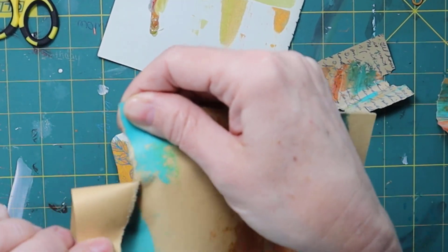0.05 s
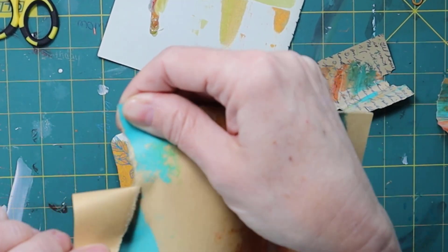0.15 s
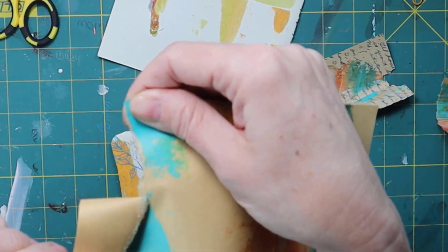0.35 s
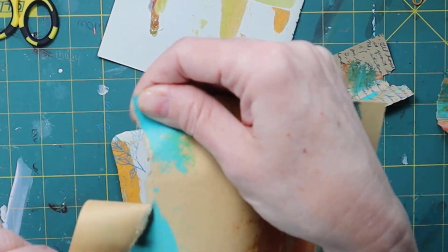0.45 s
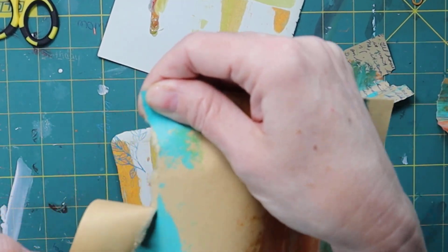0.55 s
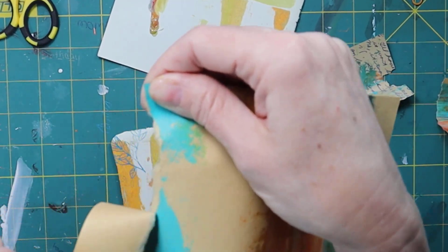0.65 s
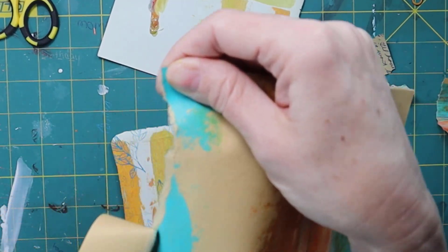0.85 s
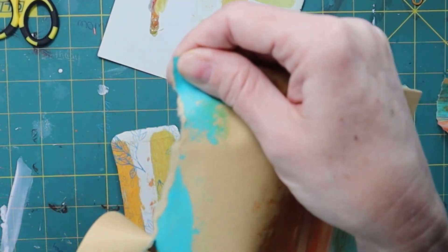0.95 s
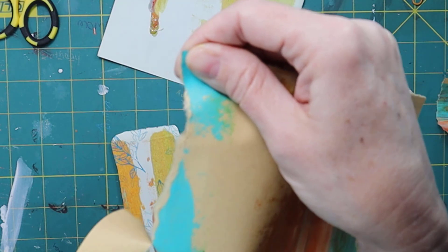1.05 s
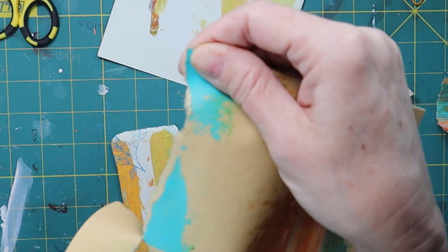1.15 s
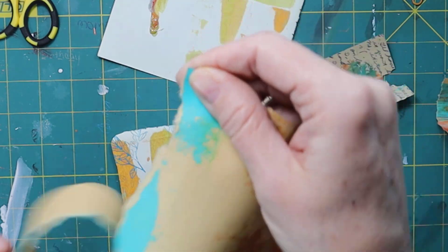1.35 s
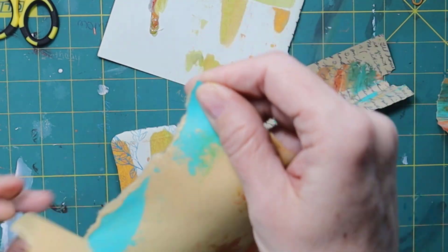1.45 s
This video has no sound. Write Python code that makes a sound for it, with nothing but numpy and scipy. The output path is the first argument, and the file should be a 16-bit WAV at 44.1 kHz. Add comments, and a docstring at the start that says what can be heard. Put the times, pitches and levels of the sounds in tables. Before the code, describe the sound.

Stiff paper torn by hand, light crackles first, then a growing rip that stops abruptly

```python
"""First a few light crackles, then a growing rip: stiff paper is torn by hand in a small quiet room.
Random clicks for snapping fibres, bunched into jerks and bursts, ring seven zones of the sheet.
The loose flap pops as it buckles: each pop is a short sine. Filtered noise makes a low rumble.
Noise that dies away gives the room's short tail, over a faint steady background."""
import sys
import numpy as np
from scipy import signal
from scipy.fft import rfft, irfft
from scipy.io import wavfile
from scipy.ndimage import uniform_filter1d

SR = 44100
rng = np.random.default_rng(int(sys.argv[2]) if len(sys.argv) > 2 else 0)


def store_pcm(level_fs):
    """Save levels as 16-bit WAV."""
    pcm = np.round(np.clip(level_fs, -1, 1) * 32767).astype(np.int16)
    wavfile.write(sys.argv[1], SR, np.atleast_2d(pcm).T)


N = 66150  # samples: 1.5 s
T = np.arange(N) / SR


def amp(db):
    """Turn decibels into a plain multiplier."""
    return 10 ** (np.asarray(db, float) / 20)


def unit(x):
    """Scale to an average (RMS) level of 1."""
    return x / np.sqrt(np.mean(x ** 2))


def ring(x, hz, width):
    """A resonance favours sound near its pitch; applied twice, it leaves dark valleys around it."""
    b, a = signal.iirpeak(hz, hz / (2.666 * width), fs=SR)
    once = signal.lfilter(b, a, x)
    return signal.lfilter(b, a, once)


def sprinkle(per_s, spread_db):
    """Clicks at random moments, some larger than the rest."""
    clicks = rng.random(N) < per_s / SR
    extra = np.minimum(rng.exponential(size=N), 3)  # capped, so no click is huge
    return clicks * amp(spread_db * extra)


RISE_S, FALL_S = 0.0003, 0.0015  # time constants


def swell(times, sizes):
    """A quick rise and a short fall at each moment."""
    starts = np.zeros(N)
    at = np.clip((np.asarray(times) * SR).astype(int), 0, N - 1)
    np.add.at(starts, at, sizes)
    t = T[:1500]
    shape = (1 - np.exp(-t / RISE_S)) * np.exp(-t / FALL_S)
    return signal.fftconvolve(starts, shape / shape.max())[:N]


def walk(rate):
    """Random levels 1 / rate seconds apart, with steady slides from each to the next."""
    spacing = int(SR / rate)
    steps = np.repeat(rng.standard_normal(N // spacing + 1), spacing)
    return unit(uniform_filter1d(steps, spacing)[:N])


# tone of the background, before its overall level is set: (f/Hz, relative level/dB)
BACKGROUND_TONE = [(15, -35), (25, 9), (129, -2), (703, -3), (1240, -42), (1530, -7), (4750, -4.5),
                   (14300, -17), (15500, -12)]
BACKGROUND_DB = -60


def background():
    """The faint steady noise of room and microphone: random noise shaped by pitch."""
    hz = np.maximum(np.arange(N // 2 + 1) * SR / N, 1)
    tone_hz, tone_db = np.array(BACKGROUND_TONE).T
    shape_db = np.interp(np.log(hz), np.log(tone_hz), tone_db)
    spectrum = rfft(rng.standard_normal(N)) * amp(shape_db)
    return amp(BACKGROUND_DB) * unit(irfft(spectrum, N))


# T60: time to fall by 60 dB; the early part comes from table and hands
EARLY_T60_S, EARLY_DB = 0.082, -11
ROOM_T60_S, ROOM_TREBLE_T60_S, ROOM_DB = 0.36, 0.34, -11
ROOM_GAP_S = 0.004  # silence before both parts start


def room(x):
    """Close reflections that fade fast and a longer diffuse tail, starting together; treble dies sooner."""
    t = T[:SR // 2]
    noise = rng.standard_normal(len(t))
    low = signal.sosfilt(signal.butter(1, 3500, fs=SR, output="sos"), noise)
    treble = noise - low
    after_gap = t > ROOM_GAP_S
    close = noise * amp(-60 * t / EARLY_T60_S) * after_gap
    diffuse = low * amp(-60 * t / ROOM_T60_S) + treble * amp(-60 * t / ROOM_TREBLE_T60_S)
    diffuse = diffuse * after_gap
    tail = amp(EARLY_DB) * close / np.linalg.norm(close)
    tail = tail + amp(ROOM_DB) * diffuse / np.linalg.norm(diffuse)
    return x + signal.fftconvolve(x, tail)[:N]


# how hard the hand pulls: (t/s, level/dB), before the colour of each zone is added
PULL = [(0, -45), (.03, -60), (.07, -51), (.1, -42.5), (.12, -71), (.194, -81), (.198, -37), (.235, -42),
        (.26, -35.5), (.33, -41), (.37, -36.5), (.41, -38.5), (.43, -34), (.47, -36.5), (.56, -35.5),
        (.6, -34), (.615, -41), (.686, -44.5), (.7, -39), (.8, -31.5), (.95, -35.5), (.965, -31),
        (1.05, -30), (1.16, -31.5), (1.18, -43), (1.205, -38.5), (1.23, -65), (1.385, -61.5), (1.41, -54.5),
        (1.43, -50.5), (1.46, -46.5), (1.48, -55), (1.5, -46.5)]


def pull_level():
    """The pull of the hand in dB, sliding evenly from one table row to the next."""
    return np.interp(T, *np.array(PULL).T)


RUMBLE_DB, RUMBLE_HZ = -44, 97  # half the pull level is added to RUMBLE_DB


def rumble(pull_db):
    """Low resonant noise that grows with the pull and wavers at random."""
    level = amp(pull_db / 2 + RUMBLE_DB + 2.1 * walk(9.8))
    return level * unit(ring(rng.standard_normal(N), RUMBLE_HZ, 67))


# the flap buckles: (t/s, peak level/dB, f/Hz)
POPS = [(0.29, -31, 333), (0.493, -43, 124), (.702, -19.5, 480), (.731, -26.5, 380), (.753, -20.5, 420),
        (.780, -25, 385), (.790, -27, 435), (.811, -21.5, 423), (.841, -27, 460), (.865, -28.5, 431),
        (.876, -27, 456), (.902, -24.5, 370), (0.923, -29, 423), (0.937, -31.5, 262), (1.1876, -16, 1385),
        (1.365, -24, 1254), (1.3658, -31, 1790)]
POP_CYCLES, POP_LAW = 4.8, 0.37  # cycles at 1 kHz; deeper pops stop after fewer


def pops():
    """Each buckle of the flap is a sine that swells fast and stops within a few cycles."""
    out = np.zeros(N)
    for start, db, hz in POPS:
        t = T - start
        cycles = POP_CYCLES * (hz / 1000) ** POP_LAW
        done = np.clip(t * hz / cycles, 0, 1)  # share of its length
        envelope = np.sin(np.pi * done ** 0.79) ** 2
        out += amp(db) * envelope * np.sin(2 * np.pi * hz * t)
    return out


SNAPS_PER_S, SNAP_SPREAD_DB = 14000, 2.5


def snaps():
    """Each snapping fibre is one click, pushing up or down at random."""
    return unit(sprinkle(SNAPS_PER_S, SNAP_SPREAD_DB) * rng.choice([-1., 1.], N))


JERKS_PER_S, JERK_SPREAD_DB, JERK_DB = 260, 2, 1


def jerks():
    """The tear advances in small random jerks, each a brief swell in level."""
    jerk = sprinkle(JERKS_PER_S, JERK_SPREAD_DB)
    at = np.flatnonzero(jerk)
    return amp(JERK_DB) * swell(at / SR, jerk[at])


# resonances of each zone of the sheet: (f/Hz, width setting/Hz, relative level/dB)
CRACKLE = [(4450, 420, 2), (5200, 550, -1), (5950, 550, -1)]
DRUM = [(170, 156, -12.5), (254, 55, 5.5), (786, 175, 1.5)]
FLAP = [(378, 85.5, 1), (463, 112, 1.5), (616, 119, -7)]
BODY = [(1195, 153, 1), (1405, 86.6, 1), (1946, 412, -1.5)]
UPPER = [(2586, 170, -0.025), (3103, 110, -3)]
BRIGHT = [(4300, 190, -2), (3470, 140, 0)]
TREBLE = [(7680, 1400, 7.54), (11480, 990, 1.7), (14170, 2570, 0.66)]
ZONES = CRACKLE, DRUM, FLAP, BODY, UPPER, BRIGHT, TREBLE


def ring_zone(x, zone):
    """Paper rings at several pitches at once; neighbours are added with opposite signs."""
    return sum((-1) ** j * amp(db) * ring(x, hz, width) for j, (hz, width, db) in enumerate(zone))


# strong bursts of fibres, before halving and the zone colour:
# (t/s, peak level/dB, level added in drum, flap and body/dB)
BURSTS = [(0.0321, -23.5, -3), (0.079, -32.5, 0), (0.0832, -34, -4), (.094, -28, -2), (0.176, -29.5, -3),
          (0.196, -28, 7), (0.214, -25.5, 9), (0.2255, -23.5, 1), (0.251, -26, -2), (0.258, -22.5, 1.5),
          (0.263, -21.5, -13), (.286, -38.5, 11), (0.341, -19.5, -17), (.415, -21.5, -2), (0.43, -19, -16),
          (0.456, -20, -12), (.466, -22, -6), (0.488, -18.5, -5), (0.503, -26, 8.5), (.519, -21, -0.5),
          (0.542, -22.5, 4), (0.549, -24.5, -7), (.552, -14.5, 0.5), (0.564, -18, -4), (0.573, -27, 9.5),
          (0.59, -18.5, 1.5), (0.621, -17.5, 1.5), (0.6506, -21, 2), (0.681, -23, 3), (.693, -19, -2.5),
          (0.703, -23, 8), (0.718, -22, 2.5), (.753, -21.5, -2), (0.78, -27, 2.5), (0.963, -16, -6.5),
          (0.969, -11, -8), (.981, -15.5, -5), (1.001, -15, -5), (1.011, -17, -4), (1.023, -22, 8.5),
          (1.046, -22, 1), (1.062, -21.5, 8), (1.078, -17.5, -5), (1.085, -16, 5), (1.096, -19.5, 3.5),
          (1.109, -15, 1), (1.131, -14.5, -0.5), (1.136, -15.5, 3.5), (1.146, -17, 5), (1.153, -24, 8.5),
          (1.158, -18, 4.5), (1.168, -20.5, 8.5), (1.1866, -21.5, 7), (1.2018, -17, -2), (1.218, -28, -12),
          (1.242, -20.5, 1), (1.454, -32.5, 10)]
# how the zones ring against the pull: (t/s, crackle level/dB, drum level/dB, flap level/dB,
# body level/dB, upper body level/dB, bright ring level/dB, treble level/dB)
COLOUR = [(0, -0.5, -18, -19, -6.5, -10, -21, -7), (.1, -0.5, -26, -18.5, -11, -24, -2, -4.5),
          (.26, 0, -26, -18, -7, -6, -10.5, -3.5), (.47, -2, -29, -17.5, -3.5, -18, -11.5, -6.5),
          (0.509, -1, -10.5, -5, 0.5, -3.5, -4.5, -1), (.66, 0, -26, -6, -2.5, -5.5, -3.5, -2),
          (0.711, -4.5, -18, -2.5, 2, -1, 4.5, 1.5), (0.919, -1.5, -28, -6, 0.5, 1, -1.5, 1),
          (0.968, -4.5, -11.5, -10.5, 0.5, -2.5, 1.5, -4.5), (1.16, -1, -11.5, -16, -2.5, -7.5, -2.5, -2),
          (1.222, 0, -5, -15, 5, -8, -4.5, -4), (1.33, -3, -7, -5, -4, -2, -6, -4.5),
          (1.39, 0, 5, -1, -7, 1, -2, -0.5), (1.429, -3, -9, -5.5, -2, -8, -3, -2),
          (1.5, -2, -10, -5, 2, -14, -1.5, -3)]
OWN_SHARE = 0.34  # share of snap energy that each zone has to itself


def tear(pull_db):
    """Snapping fibres, bunched into jerks and bursts, ring each zone; zones share part of both."""
    shared_snaps, shared_jerks = snaps(), jerks()
    burst_s, peak_db, low_db = np.array(BURSTS).T
    colour_s, *zone_colours = np.array(COLOUR).T
    burst_extras = 0, low_db, low_db, low_db, 0, 0, 0  # in the order of ZONES
    out = 0
    for zone, colour_db, extra_db in zip(ZONES, zone_colours, burst_extras):
        fibres = np.sqrt(1 - OWN_SHARE) * shared_snaps + np.sqrt(OWN_SHARE) * snaps()
        tint = amp(np.interp(T, colour_s, colour_db))
        pull = amp(pull_db) * unit(1 + shared_jerks + jerks())
        burst = swell(burst_s, amp(peak_db + extra_db)) / 2
        driven = fibres * tint * np.hypot(pull, burst)
        # dividing by the steady ring keeps narrow and wide zones comparable
        out = out + ring_zone(driven, zone) / np.std(ring_zone(fibres, zone))
    return out


def scene():
    """Tear, rumble and pops sound in the room, over its background."""
    pull_db = pull_level()
    paper = tear(pull_db) + rumble(pull_db) + pops()
    return (room(paper) + background())[None]


TOP_HZ = 15750


def record(dry):
    """A steep filter removes the very highest treble, above TOP_HZ."""
    return signal.sosfilt(signal.ellip(12, .3, 85, TOP_HZ, fs=SR, output="sos"), dry)


dry = scene()
out = record(dry)
store_pcm(out)
```